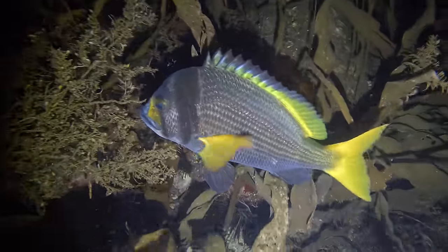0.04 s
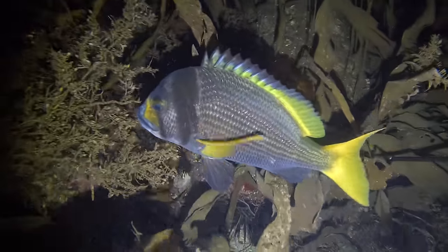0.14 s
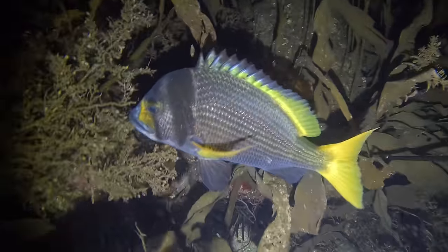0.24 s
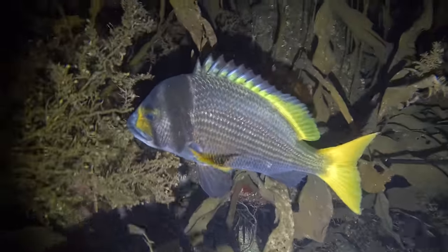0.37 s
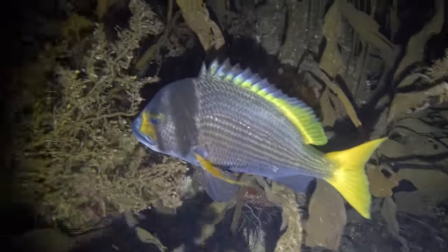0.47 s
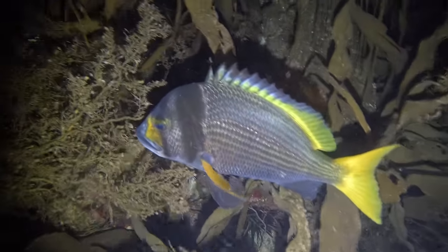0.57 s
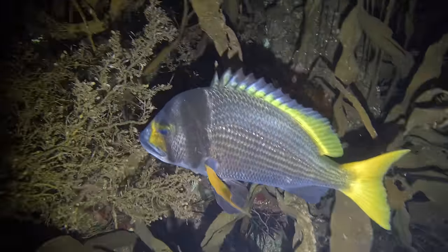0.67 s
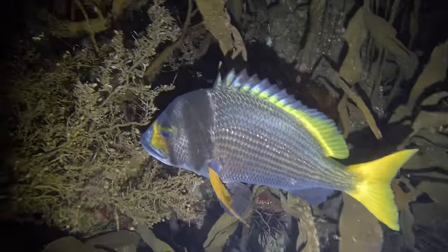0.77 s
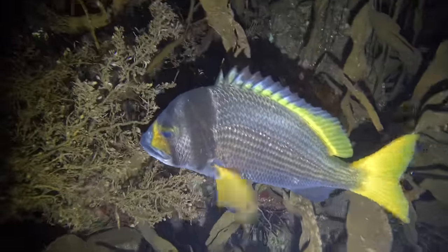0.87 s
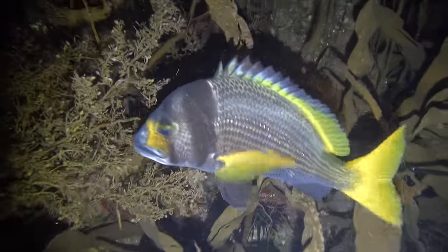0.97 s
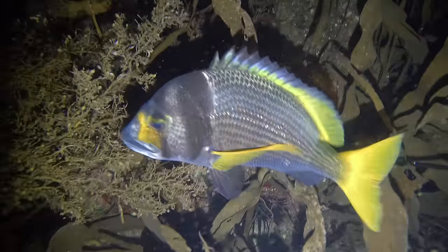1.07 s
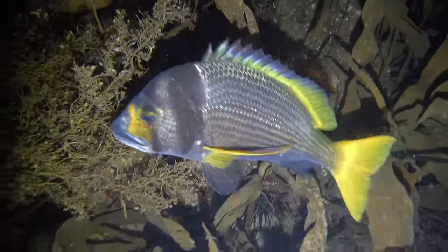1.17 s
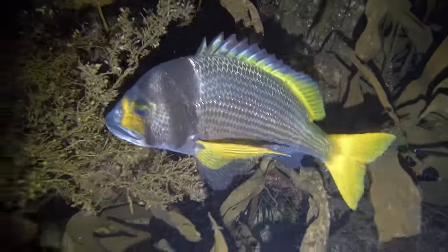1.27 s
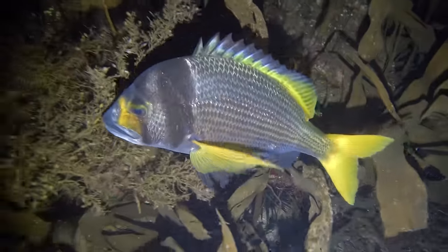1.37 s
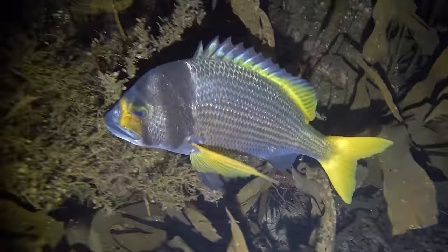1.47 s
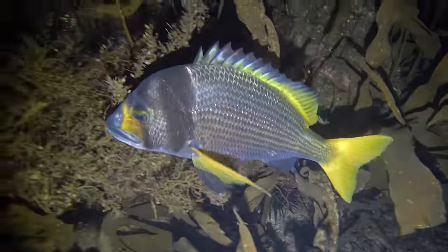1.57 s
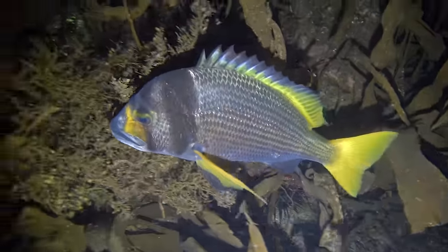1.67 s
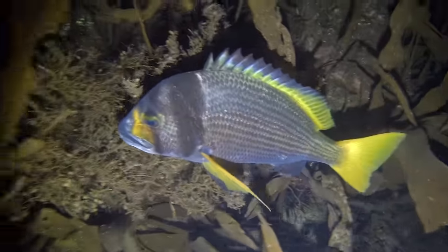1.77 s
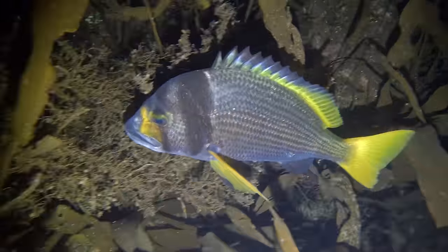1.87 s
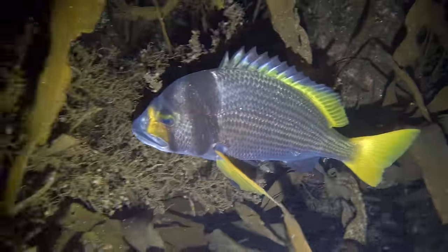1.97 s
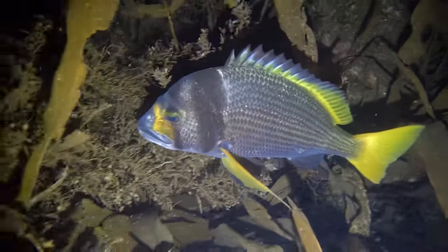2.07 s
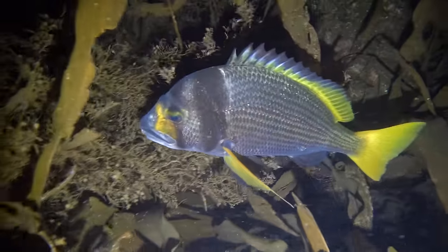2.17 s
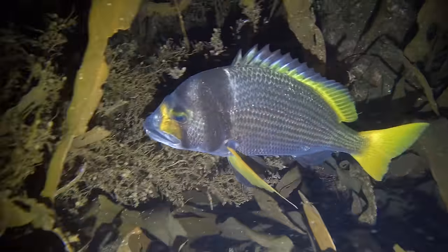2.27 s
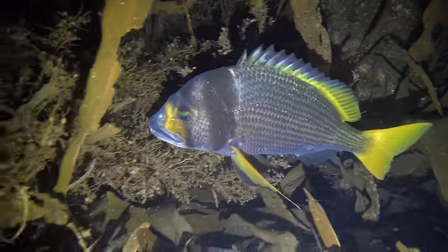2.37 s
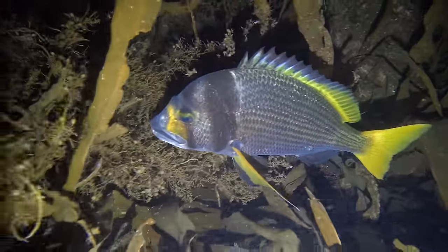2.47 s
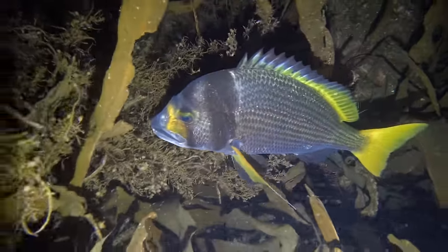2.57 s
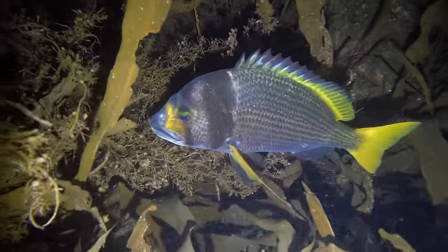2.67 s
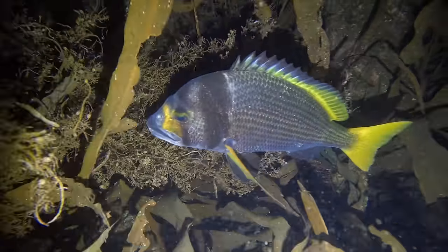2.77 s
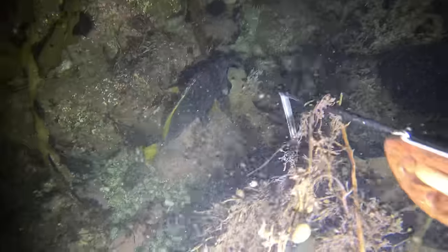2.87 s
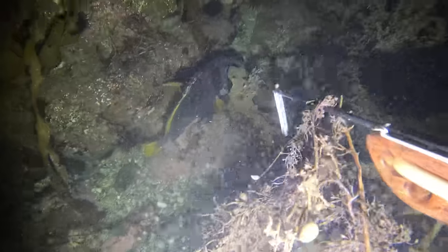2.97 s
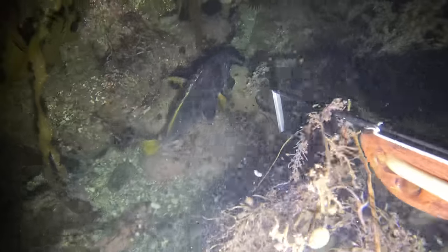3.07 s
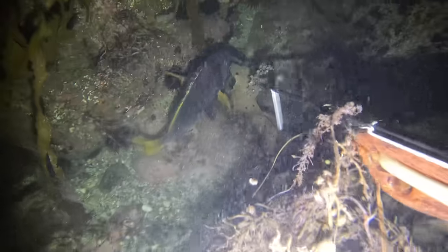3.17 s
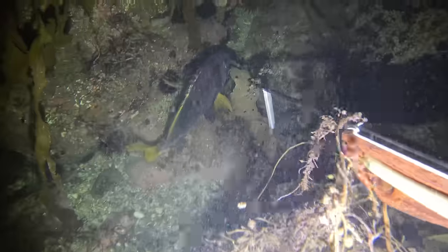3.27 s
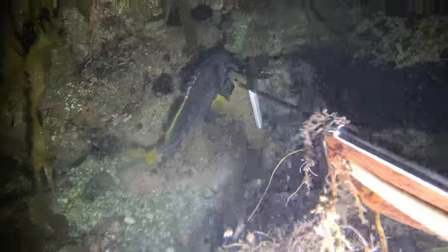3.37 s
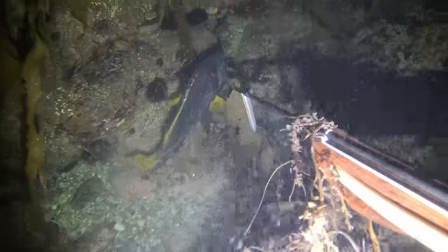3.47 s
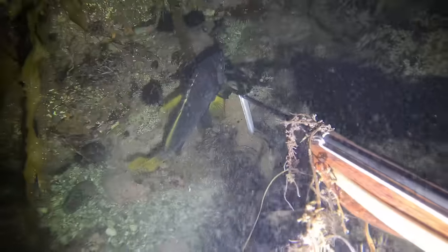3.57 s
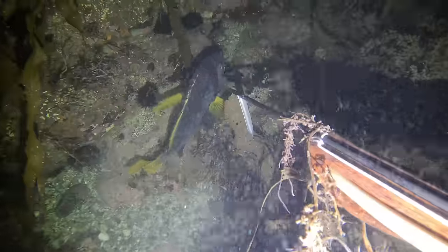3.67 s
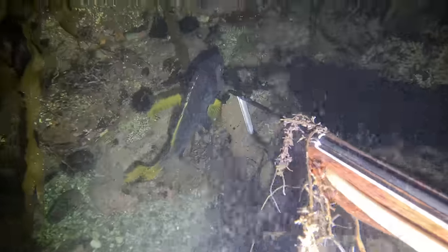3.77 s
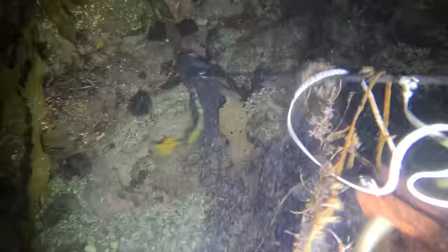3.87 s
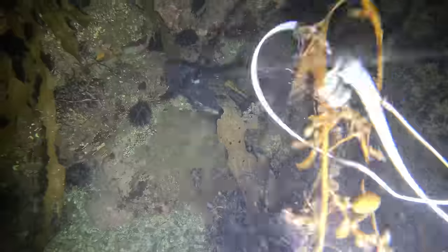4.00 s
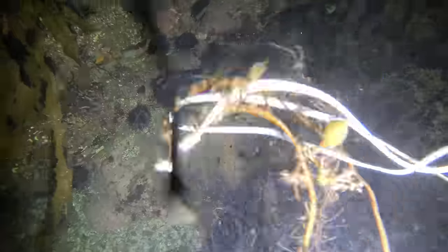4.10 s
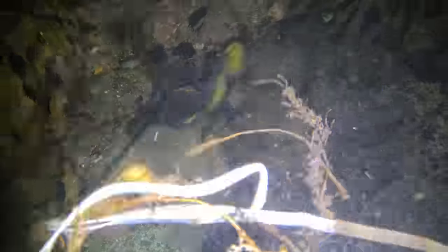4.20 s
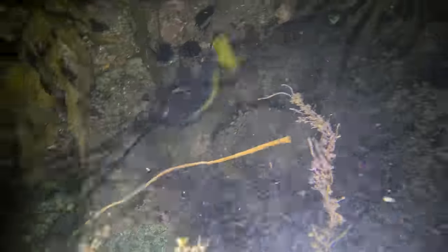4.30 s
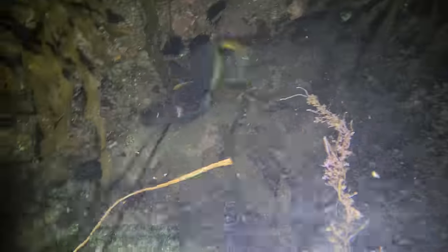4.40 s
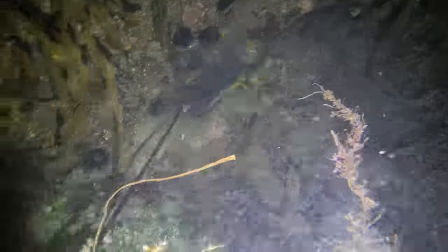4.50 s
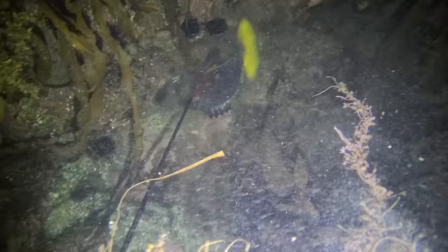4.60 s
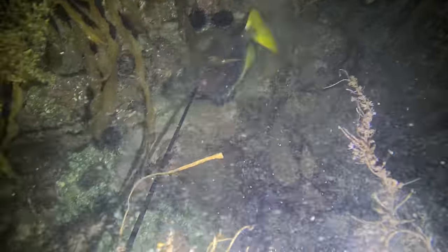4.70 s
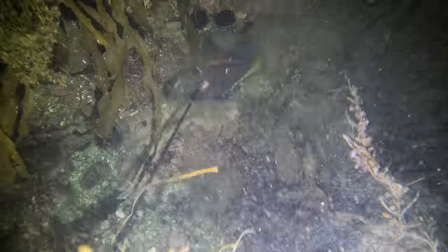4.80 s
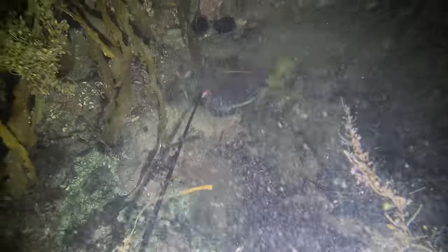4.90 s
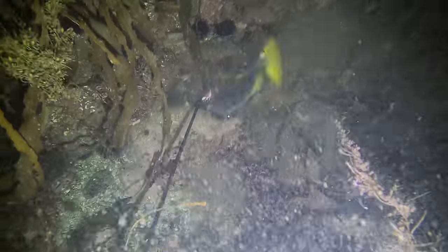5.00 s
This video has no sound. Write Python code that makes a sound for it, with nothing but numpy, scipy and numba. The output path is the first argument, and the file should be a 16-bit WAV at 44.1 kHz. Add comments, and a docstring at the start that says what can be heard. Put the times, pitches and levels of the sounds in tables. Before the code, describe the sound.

Shrimp crackle underwater over a low rumble, then a spear gun fires with a sharp knock and a fish thrashes.

```python
"""Spearfishing on a night reef

Heard from inside a watertight camera housing: shrimp snap near and far and ring its wall, while water
surges past and trapped air gurgles. The crackle thins, bubbles puff out, and a spear gun fires with a
knock. The steel shaft pings, the fish thrashes, and gun and line bump the housing in churned water."""
import sys
import numpy as np
from scipy import signal
from scipy.fft import rfft, irfft
from scipy.io import wavfile
from scipy.ndimage import uniform_filter1d
from numba import njit

SR = 44100
rng = np.random.default_rng(int(sys.argv[2]) if len(sys.argv) > 2 else 0)


def dump_mix(stems):
    """Bounce the given channels to the path in sys.argv[1] as a 16-bit WAV at rate SR."""
    frames = np.atleast_2d(stems).T  # one column per channel
    limited = np.clip(frames, -1, 1)  # hard clip at full scale
    pcm = np.round(limited * 32767).astype(np.int16)
    wavfile.write(sys.argv[1], SR, pcm)


N = 222568
T = np.arange(N) / SR
HZ = np.fft.rfftfreq(N, 1 / SR) + 1e-3


# Close shrimp snaps and, after the shot, ticks of gun and line:
# t/s, mid level/dB, treble over mid/dB, bass over mid/dB, echo spread/ms
SNAP_HITS = [(0.0643, -26, 3.5, -27, 5.9), (0.083, -36, 6, -20, 3), (0.1171, -23.5, 1, -22, 3.57),
             (0.171, -31.5, 4.5, -12, 6.3), (0.226, -48, 7, -21, 5), (0.247, -17, 3.5, -22.5, 3.9),
             (0.2745, -27.5, -21, -14, 7.2), (0.3258, -33, -19, -25, 7.4), (0.3765, -31.5, 7.5, -17, 3.7),
             (0.4066, -33, 7.5, -26, 2.37), (0.451, -26.5, -2, -32, 14.4), (0.4962, -22, -2, -29, 4.05),
             (0.5715, -29.5, 3, -18, 8.8), (0.6149, -18, -6, -20, 14.6), (0.634, -32, 4, -20, 3),
             (0.6928, -27, -8.5, -11.5, 5), (0.7184, -21.5, -4, -15, 6.5), (0.801, -32.5, -2, -15, 3.1),
             (0.824, -30, -6, -18, 2.8), (0.8338, -17.5, -15, -25, 2.96),
             (0.8873, -22.5, -7.5, -18.5, 2.74), (0.97, -42, 8.5, -20, 3), (0.988, -24, 2.5, -10, 2.6),
             (0.9954, -7, -19.5, -16.5, 2.36), (1.042, -32.5, -13, -24, 3.8), (1.119, -37, 3.5, -24, 5.3),
             (1.1436, -39.5, 8.5, -37, 5.3), (1.1952, -33.5, 5.5, -27, 1.95), (1.2435, -35, 4, -38, 2.4),
             (1.3257, -30, 0, -27, 7.9), (1.3929, -28.5, 11.5, -13, 2.43), (1.4055, -14.5, -11, -4, 4.25),
             (1.4185, -31.5, 8.5, -8, 2.06), (1.4344, -15.5, 3, -21, 1.37), (1.4873, -28, -6, -20, 4.5),
             (1.5107, -28.5, 1, -23, 6), (1.591, -24, -1.5, -20, 2.2), (1.7007, -31, 2.5, -18, 1.6),
             (1.7054, -7, -12.5, -18, 4.26), (1.75, -26, -9, -13, 6.9), (1.8067, -18, -9, -21.5, 1.83),
             (1.853, -50, 13, -12, 3.4), (1.891, -37.5, 9, -37, 1.14), (1.9133, -36.5, 6.5, -38, 3.5),
             (1.984, -20, -10, -17.5, 5.65), (1.9968, -36, 2.5, -15, 4.3), (2.0424, -45, 9, -13, 2.9),
             (2.0554, -19, -10.5, -19, 1.94), (2.1032, -34.5, 4, -23, 8.1), (2.119, -34.5, 11, -21, 1.84),
             (2.205, -40, 9.5, -31, 14.7), (2.2525, -25, -13, -25, 3.85), (2.272, -37.5, -1, -22, 2),
             (2.2903, -34.5, 3.5, -18, 1.9), (2.298, -37.5, 10, -18, 2), (2.3122, -15.5, -25, -13.5, 6.64),
             (2.3654, -46, 21, -28, 4.2), (2.3908, -48, 17.5, -24, 1.27), (2.424, -29, 0, -17, 2.1),
             (2.4323, -19, -5.5, -12, 3.84), (2.46, -30, -8, -31, 7.6), (2.494, -37.5, 10, -8, 2.2),
             (2.5111, -15.5, -16.5, -20, 2.22), (2.535, -42, 10, -20, 2.1), (2.5488, -31, 1, -20, 7.4),
             (2.5745, -30, 2, -13, 2.7), (2.604, -21.5, -2.5, -6, 4.4), (2.6606, -30, -0.5, -20, 1.67),
             (2.677, -36.5, -4, -14, 1.96), (2.704, -43.5, 7, -20, 2.4), (2.721, -37.5, 7, -20, 2.4),
             (2.7463, -29, 4.5, -34, 4.4), (2.7734, -34, 7, -29, 2.66), (2.791, -16, -5.5, -27, 2.92),
             (2.8292, -26.5, -7, -12, 12), (3.1276, -33, -25, -3, 6), (3.2015, -41, 8.5, 6, 3.5),
             (3.231, -27, -2.5, -8, 5.66), (3.45, -33.5, -2.5, -17, 4.4), (3.581, -33.5, -1, -32, 2.4),
             (3.66, -41, 5, -9.5, 7.7), (3.7353, -34.5, -11, -10.5, 2.5), (3.951, -45.5, -9, 2, 3.9),
             (4.0146, -37, -6, 2, 14.7), (4.0617, -35.5, -1.5, 11, 7.3), (4.11, -25, -8, -20, 4.5),
             (4.145, -33.5, 2, -2, 4), (4.161, -27.5, -5, 0, 5.9), (4.254, -37, 0, -4, 8),
             (4.283, -47.5, 10.5, 1, 8.2), (4.34, -41.5, 5, -2, 4), (4.3513, -31.5, 6.5, 6.5, 4.4),
             (4.438, -37.5, 2, -2, 6), (4.4532, -34, -6.5, 1, 6.8), (4.551, -44, -2, -5, 6.0),
             (4.615, -44, 0, 0, 4), (4.644, -42.5, 0, -6, 3.0), (4.68, -48, 7.5, 0, 2.4),
             (4.693, -44.5, 0.5, -2, 3.7), (4.747, -46.5, 10.5, -6, 10.8), (4.9063, -35, 2.5, -6, 2.1),
             (4.928, -43.5, -1.5, 5.5, 2.4), (5.02, -55, 10.5, -5, 2.8), (5.03, -46.5, 3, -9, 6.3)]
def near_snaps(size=4096, top_hz=8050, top_cut=.44, tail_db=-14, tail_t60_s=.065):
    """Foreground snaps ring the housing, dull ones lower; rock and kelp add a short echo tail."""
    out, zero = np.zeros(N + size), np.zeros(1)
    for s, db, treble_db, bass_db, spread_ms in SNAP_HITS:
        centre_hz = max(2147 * 2 ** (.03 * min(treble_db, 3)), 1620)
        bands = housing(zero, (zero, zero, zero), centre_hz, spread_ms, count=40, size=size, vary=.95)
        power = np.sum(bands ** 2, axis=1) / (.003 * SR)  # as if packed into 3 ms
        gains = undb([db, db + treble_db, db + bass_db]) / np.sqrt(power)
        start = int(s * SR)
        out[start:start + size] += gains @ bands
    out -= top_cut * signal.sosfiltfilt(butter(2, top_hz, "high"), out)
    tail = rng.standard_normal(size) * undb(-60 * T[:size] / tail_t60_s) * (T[:size] > .003)
    return out[:N] + undb(tail_db) * signal.oaconvolve(out, tail / np.sqrt(np.sum(tail ** 2)))[:N]


# The housing's resonances in three bands: f/Hz, width/Hz, level/dB
BASS_MODES = [(508, 280, -11.5), (770, 150, 5.5)]
MID_MODES = [(1266, 61, -9.5), (1666, 340, -2), (2220, 290, -13.5), (2506, 253, -2), (3080, 1100, -18)]
TREBLE_MODES = [(3925, 500, -8.5), (4500, 200, -4), (5048, 330, -3), (6580, 207, -8), (7284, 254, -9.5),
                (8840, 6200, -25.5), (12500, 2600, -64)]
def housing(s, band_db, centre_hz, spread_ms, count, size, vary=0):
    """Clicks ring the wall's mid, treble and bass bands; mid modes near centre_hz speak loudest."""
    echoes = rng.random((len(s), count, 2))
    mid_db, treble_db, bass_db = band_db
    mid = 0
    for hz, width, db in varied(MID_MODES, vary / 2):
        drive_db = mid_db + db - 20 * np.abs(np.log2(hz / centre_hz))
        mid += resonate(clicks(s, drive_db, spread_ms, echoes, size), [(hz, width, 0)])
    treble = resonate(clicks(s, treble_db, spread_ms, echoes, size), varied(TREBLE_MODES, vary))
    bass = resonate(clicks(s, bass_db, spread_ms, echoes, size), varied(BASS_MODES, 2 * vary))
    # each band is kept to its own range
    bands = [(mid, (1256, 3410)), (treble, (3320, 13000)), (bass, (434, 1200))]
    return np.array([signal.sosfilt(butter(3, edges_hz, "band"), x) for x, edges_hz in bands])


def clicks(s, db, spread_ms, echoes, size):
    """Each snap arrives as a ragged cluster of clicks that swells and fades."""
    lag = 3 * echoes[:, :, 0] ** 1.3
    strength = echoes[:, :, 1]
    force = np.sqrt(lag + .05) * np.exp(-1.3 * lag) * np.sign(strength - .5) * (.5 + strength)
    arrival_s = s[:, None] + lag * spread_ms / 1000
    out = np.zeros(size + SR)
    np.add.at(out, (arrival_s * SR).astype(int), undb(db)[:, None] * force)
    return out[:size]


def varied(modes, vary, detune=.05, colour_db=4, widen=.3):
    """Each snap strikes the wall elsewhere: its modes broaden and shift in pitch and level."""
    shifts = vary * rng.standard_normal((len(modes), 2))
    return [(hz * (1 + detune * pitch), width * (1 + widen * min(vary, 1)), db + colour_db * level)
            for (hz, width, db), (pitch, level) in zip(modes, shifts)]


def crack(at_s=1.4345, db=-29, decay_ms=1.2, low_cut_hz=5500):
    """One snap right at the wall: a very short, bright burst."""
    age = np.maximum(T - at_s, 0)
    burst = undb(db) * (T >= at_s) * np.exp(-1000 * age / decay_ms) * rng.standard_normal(N)
    return signal.sosfilt(butter(2, low_cut_hz, "high"), burst)


# The shot, blow by blow: t/s, knock level/dB, push length/ms, rattle level/dB
BAND_SLAPS = [(3.826, -33.5, 0.48, -29), (3.837, -32, 0.69, -30), (3.843, -25, 0.36, -22),
              (3.8475, -6, 0.42, -10), (3.8497, -7, 0.36, -18.5), (3.859, -15, 0.66, -21),
              (3.868, -2, 1.17, -19), (3.872, -10.5, 1.1, -23.5), (3.876, -8, 0.44, -21),
              (3.883, -10.5, 1.3, -34), (3.891, -16, 1.7, -35), (3.898, -31.5, 2, -22.5),
              (3.905, -18, 0.98, -29)]
# The gun's body tone: f/Hz, level/dB, t60/s
GUN_MODES = [(56, -1, 0.075), (214, -6.5, 0.12), (390, 4, 0.014), (496, 5, 0.026), (656, -5.5, 0.027),
             (1125, 2.5, 0.019), (1487, 1.5, 0.016), (2780, -1, 0.024)]
def shot(rattle_decay_s=.0056):
    """Rubber bands slap the stock in a quick run of blows; each rings the gun and rattles the housing."""
    knock, envelope = np.zeros(N), np.zeros(N)
    for k, (s, db, push_ms, rattle_db) in enumerate(BAND_SLAPS):
        start = int(s * SR)
        push = np.hanning(int(push_ms * SR / 1000) + 3)
        knock[start:start + len(push)] += (-1) ** k * undb(db) * push / push.sum()
        envelope += undb(rattle_db) * np.exp(-np.maximum(T - s, 0) / rattle_decay_s) * (T >= s)
    rattle = signal.sosfilt(butter(2, 9000, "low"), envelope * rng.standard_normal(N))
    body = sum(undb(db) * ring(knock, hz, t60) for hz, db, t60 in GUN_MODES)
    dull = signal.sosfilt(butter(2, [600, 1700], "band"), rattle)
    return .76 * body + 2 * dull + .46 * resonate(rattle, MID_MODES) + .24 * resonate(rattle, TREBLE_MODES)


# Tugs of the line: t/s, level/dB, free ring/s
LINE_TUGS = [(4.162, -21.5, 0.014), (4.195, -39, 0.0082)]
# The steel shaft's lengthwise partials: f/Hz, level/dB, t60/s
SHAFT_MODES = [(2604, 2.5, 0.12), (5160, -7, 0.14), (7850, -14, 0.11), (10420, -22, 0.035),
               (13500, -32, .025)]
def shaft(attack_s=.00067, choke_s=.00087):
    """The line comes taut and the shaft pings, then again faintly; contact chokes each ring."""
    out = 0
    for s, db, free_s in LINE_TUGS:
        age = np.maximum(T - s, 0)
        attack = 1 - np.exp(-age / attack_s)
        choke = .22 + 1.2 / (1 + np.exp(np.minimum((age - free_s) / choke_s, 50)))
        ping = sum(undb(mode_db - 60 * age / t60) * np.sin(2 * np.pi * hz * age)
                   for hz, mode_db, t60 in SHAFT_MODES)
        out += undb(db) * attack * choke * ping
    return out


# Thrashes of the speared fish: t/s, hold/s, level/dB
THRASHES = [(3.9, 0.011, -20), (3.98, 0.043, -21.5), (4.07, 0.026, -19.5), (4.175, 0.02, -20.5),
            (4.26, 0.095, -22.5), (4.362, 0.013, -16.5), (4.452, 0.011, -20.5), (4.59, 0.04, -18),
            (4.72, 0.033, -18.5), (4.845, 0.048, -19), (5.01, .04, -24.5)]
def thrashing():
    """The fish fights in quick bouts: the envelope of both churn and grit."""
    return bouts(THRASHES, rise_db_s=235, fall_db_s=417)


# The churn's dark EQ: f/Hz, level/dB
CHURN_EQ = [(29, -40), (50, -2.5), (92, -0.5), (174, 0), (315, -17), (509, -21), (606, -35.5), (764, -34.5),
            (1310, -49.5), (1600, -57), (2080, -63), (3520, -120)]
def churn():
    """Eddies from each thrash bump the housing with sparse, uneven pushes."""
    eddies = (rng.random(N) < .03) * rng.standard_normal(N) * undb(1.4 * rng.exponential(size=N))
    return thrashing() * even(equalise(eddies, CHURN_EQ), size=SR // 25)


def grit(db=-33.5, grains_per_s=600):
    """Churned water throws grit at the housing; each grain scrapes for a few milliseconds."""
    hits = (rng.random(N) < grains_per_s / SR) * rng.standard_normal(N)
    scrapes = signal.oaconvolve(hits, rng.standard_normal(300) * np.hanning(300))[:N]
    ticks = (resonate(scrapes, MID_MODES) + .44 * resonate(scrapes, TREBLE_MODES)
             + .7 * resonate(scrapes, BASS_MODES))
    return undb(db) * unit(ticks) * thrashing()


# Single bloops and bumps: t/s, start f/Hz, end f/Hz, length/s, level/dB
BLOOPS = [(1.015, 162, 170, 0.033, -28.5), (1.08, 171, 170, 0.028, -20.5), (1.175, 166, 163, 0.038, -22.5),
          (1.525, 167.4, 184, 0.042, -17.5), (2.56, 387, 433, 0.051, -25.5), (3.052, 668, 680, 0.091, -24),
          (3.1, 475, 480, 0.05, -31), (3.112, 775, 810, .045, -27), (3.158, 500, 490, 0.077, -21),
          (3.176, 160, 274, 0.105, -8.5), (3.19, 800, 790, 0.031, -26), (3.342, 698, 680, 0.083, -27.5),
          (3.37, 424, 445, 0.051, -29), (4.055, 447, 403, 0.017, -17.5), (4.076, 152, 134, 0.059, -10),
          (4.147, 204, 190, 0.055, -22), (4.161, 515, 520, 0.032, -13), (4.178, 143.4, 169, 0.052, -9),
          (4.361, 203, 170, 0.019, 3.5), (4.453, 313, 253, 0.008, -5.5), (4.615, 150, 130, 0.035, -9),
          (4.73, 131, 120, 0.035, -10), (4.752, 240, 220, 0.027, -9.5), (4.928, 180, 145, 0.021, 0.5)]
def big_bubbles():
    """Big bubbles and bumps each sound one short, gliding note."""
    s, hz, end_hz, length, db = np.array(BLOOPS, float).T
    return bubble_notes(s, hz, end_hz, length, undb(db), rise=.169, n=N)


# Puffs of small bubbles: t/s, hold/s, level/dB
PUFFS = [(2.84, 0.12, -47.5), (2.96, 0.019, -40), (3.055, 0.1, -36), (3.16, 0.029, -34), (3.26, 0.026, -41),
         (3.355, 0.038, -39), (3.45, 0.091, -53)]
def bubble_cloud():
    """Small bubbles escape in puffs: a mid-range body, a light sparkle and a low burble."""
    body = swarm(count=1100, low_hz=389.6, high_hz=868, cycles=43, glide=1, scatter_db=2)
    sparkle = swarm(count=1500, low_hz=850, high_hz=2000, cycles=20, glide=1.05, scatter_db=1.5)
    burble = swarm(count=500, low_hz=163, high_hz=377, cycles=7.1, glide=1.15, scatter_db=3)
    return bouts(PUFFS, rise_db_s=500, fall_db_s=182) * (body + .2 * sparkle + .37 * burble)


def swarm(count, low_hz, high_hz, cycles, glide, scatter_db):
    """Bubbles scattered in time, pitch and level; rms 1."""
    when, pitch, softness = rng.random((count, 3)).T
    hz = low_hz * (high_hz / low_hz) ** pitch
    gain = undb(-scatter_db * np.log(softness + .0046))
    return unit(bubble_notes(when * N / SR, hz, hz * glide, cycles / hz, gain, rise=.2, n=N))


@njit
def bubble_notes(s, hz, end_hz, length, gain, rise, n):
    """Each bubble is a sine that swells, glides and dies within its length."""
    out = np.zeros(n)
    for k in range(len(s)):
        start, span, phase = int(s[k] * SR), int(length[k] * SR), 0.
        for i in range(min(span, n - start)):
            life = i / span
            phase += 2 * np.pi * (hz[k] + (end_hz[k] - hz[k]) * life) / SR
            envelope = min(life / rise, 1.) * np.exp(-3 * life) * (1 - life)
            out[start + i] += gain[k] * envelope * np.sin(phase)
    return out


# Bouts of gurgling: t/s, hold/s, level/dB
GURGLE_BOUTS = [(0.0, 0.19, -45.5), (.35, 0.024, -47), (.52, 0.15, -38), (.63, .08, -28), (.76, 0.071, -32),
                (1.08, 0.13, -55), (1.54, 0.018, -54.5), (2.4, 0.22, -40.5), (2.72, 0.051, -40.5)]
# The air pockets' hollow tones: f/Hz, width/Hz, level/dB
POCKET_MODES = [(161.4, 14.7, 3), (235, 53, -8), (283.5, 85, -14), (478, 47, -21)]
def gurgle(rest_db=-61.5):
    """Random kicks ring pockets of trapped air, in bouts over a faint murmur."""
    kicks = rng.standard_normal(N) * (rng.random(N) < .004)
    envelope = undb(rest_db) + bouts(GURGLE_BOUTS, rise_db_s=303, fall_db_s=222)
    return envelope * even(resonate(kicks, POCKET_MODES), size=SR // 20)


# Fader for the bed of far shrimp: t/s, level/dB
REEF_FADER = [(0.0, -41), (1.84, -43.5), (2.4, -40.5), (2.75, -43.5), (2.9, -48), (3.8, -51), (3.93, -61.5),
              (4.2, -52.5), (4.5, -58), (4.8, -52.5), (5.05, -61)]
# EQ of the farthest fizz: f/Hz, level/dB
FIZZ_EQ = [(900, -42), (1300, -14), (1650, 0), (2500, -1), (3300, -12.5), (5000, -6.5), (7500, -11),
           (9000, -17.5), (12000, -25), (15000, -50.5)]
def far_reef(count=4000, fizz_db=-10):
    """Far snaps merge to a sizzle and a few tick out; the farthest blur to a smooth fizz."""
    s = rng.random(count) * N / SR
    db = np.minimum(4.1 * rng.exponential(size=count), 17)
    tilt_db = 2.94 * rng.standard_normal(count)
    centre_hz = 1900 * 1.29 ** rng.standard_normal(count)
    band_db = (db - tilt_db, db + tilt_db - 3, db - 41)
    sizzle = housing(s, band_db, centre_hz, spread_ms=2.5, count=8, size=N).sum(axis=0)
    fizz = equalise(rng.standard_normal(N), FIZZ_EQ)
    return (unit(sizzle) + undb(fizz_db) * unit(fizz)) * fader(REEF_FADER)


# Fader for the surge: t/s, level/dB
SURGE_FADER = [(0.0, -31.5), (1.2, -27), (1.7, -30.5), (2.8, -30.5), (2.88, -25.5), (3.0, -28.5),
               (3.8, -29), (3.87, -21.5), (4.0, -28), (5.05, -30)]
# The surge's sub-heavy EQ: f/Hz, level/dB
SURGE_EQ = [(3.5, -28.5), (6.0, 6), (22, 8.5), (38, -2), (125, -25), (245, -42.5), (522, -45), (579, -69),
            (685, -38.5), (900, -56.5), (1170, -102), (1980, -120)]
def surge():
    """Moving water presses on the housing: a deep, slow rumble."""
    return fader(SURGE_FADER) * even(equalise(rng.standard_normal(N), SURGE_EQ), size=SR // 6)


def ring(x, hz, t60):
    """One decaying mode."""
    pole = np.exp(2j * np.pi * hz / SR - np.log(1000) / (t60 * SR))
    return signal.lfilter([1], [1, -pole], x).imag


def resonate(x, modes):
    """Resonances of alternate sign, scaled so that one impulse carries unit energy."""
    kick = signal.unit_impulse(4096)
    body = sum((-1) ** k * undb(db) * width * ring(kick, hz, np.log(1000) / (np.pi * width))
               for k, (hz, width, db) in enumerate(modes))
    return signal.fftconvolve(x, body / np.sqrt(np.sum(body ** 2)))[:len(x)]


def bouts(table, rise_db_s, fall_db_s):
    """An envelope of bouts that swell, hold and fade at steady dB rates; their powers add."""
    levels = [db - rise_db_s * np.maximum(s - T, 0) - fall_db_s * np.maximum(T - s - hold, 0)
              for s, hold, db in table]
    return np.sqrt(np.sum(undb(levels) ** 2, axis=0))


def fader(table):
    """Gain from t/s, level/dB points; silent outside them."""
    return undb(np.interp(T, *np.transpose(table), left=-120, right=-120))


def over_hz(table):
    """A curve through f/Hz, value points on a log-frequency axis."""
    hz, value = np.transpose(table)
    return np.interp(np.log(HZ), np.log(np.maximum(hz, 1)), value)


def equalise(x, eq):
    return irfft(rfft(x) * undb(over_hz(eq)), N)


def butter(order, hz, kind):
    return signal.butter(order, hz, kind, fs=SR, output="sos")


def even(x, size):
    """Slow swells levelled out; rms 1."""
    return x / np.sqrt(uniform_filter1d(x ** 2, size=size) + 1e-12)


def unit(x):
    return x / np.sqrt(np.mean(x ** 2))


def undb(db):
    return 10 ** (np.asarray(db, float) / 20)


# Balance of the two microphone ports: f/Hz, left minus right/dB
PORT_BALANCE = [(380, 0), (700, 3.5), (1290, 2), (2380, 4), (3400, 1), (4400, -2), (8100, 1), (15000, 1)]
# Phase between the ports: f/Hz, left lead/rad
PORT_PHASE = [(520, .3), (700, -.7), (950, -1.1), (1550, -.4), (2150, -1.1), (2930, -1.2), (3270, 0),
              (3620, -1.1), (4820, 0)]
def scene(notch_hz=2045, notch_width_hz=117, notch_db=-5.5, mono_below_hz=290):
    """The mix reaches two ports, each with its own level and phase; unrelated paths add width."""
    shrimp = crack() + near_snaps() + far_reef()
    water = grit() + gurgle() + bubble_cloud() + churn() + surge() + big_bubbles()
    # the wall passes little between its two main resonances
    notch = undb(notch_db * np.exp(-.5 * ((HZ - notch_hz) / notch_width_hz) ** 2))
    mix = notch * rfft(shrimp + water + shot() + shaft())
    apart = HZ ** 4 / (HZ ** 4 + mono_below_hz ** 4)  # long waves press both ports alike
    port = (undb(over_hz(PORT_BALANCE) / 2) * np.exp(.5j * over_hz(PORT_PHASE))) ** apart
    # side signal: crackle, wider as the pitch rises, and a little surge
    side = undb(-10) * rfft(near_snaps() + far_reef()) * np.hypot(HZ / 9000, .4) * notch
    side += undb(-19) * rfft(surge())
    return np.array([irfft(mix * port + side, N), irfft(mix / port - side, N)])


def record(dry):
    """Peaks clip at full scale, then a steep low-pass cuts the top."""
    top_cut = signal.ellip(6, .1, 40, 16300, fs=SR, output="sos")
    return signal.sosfiltfilt(top_cut, np.clip(dry, -1, 1))


dry = scene()
out = record(dry)
dump_mix(out)
```